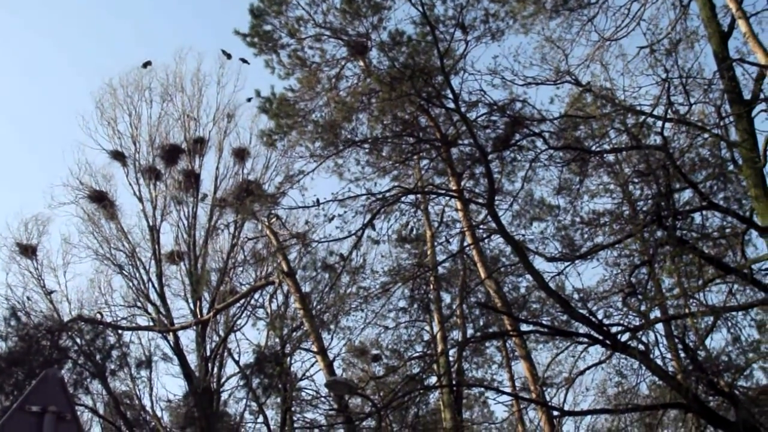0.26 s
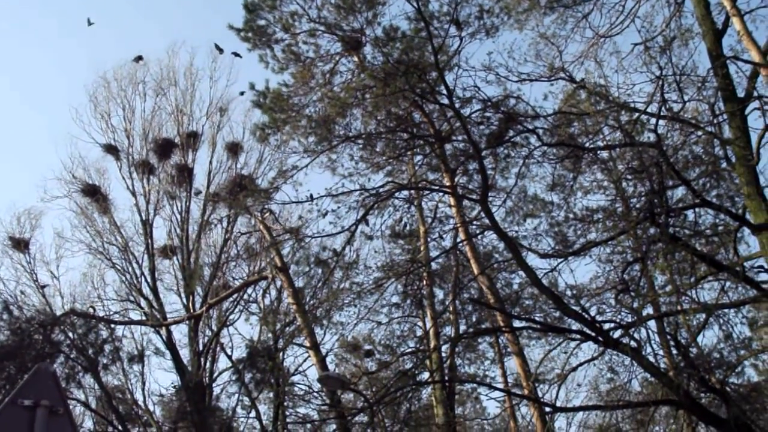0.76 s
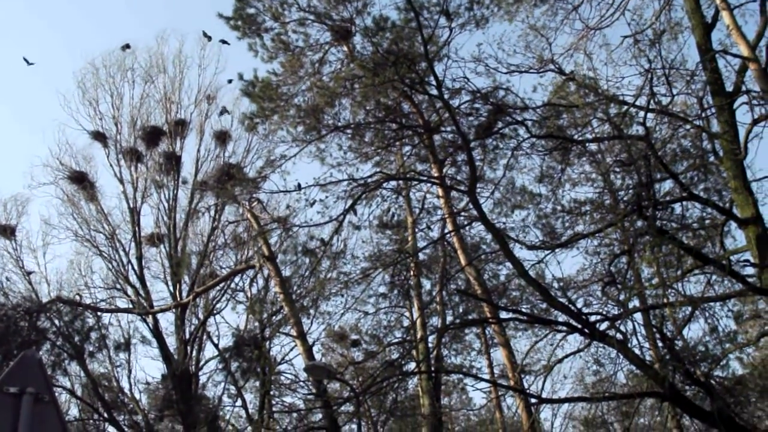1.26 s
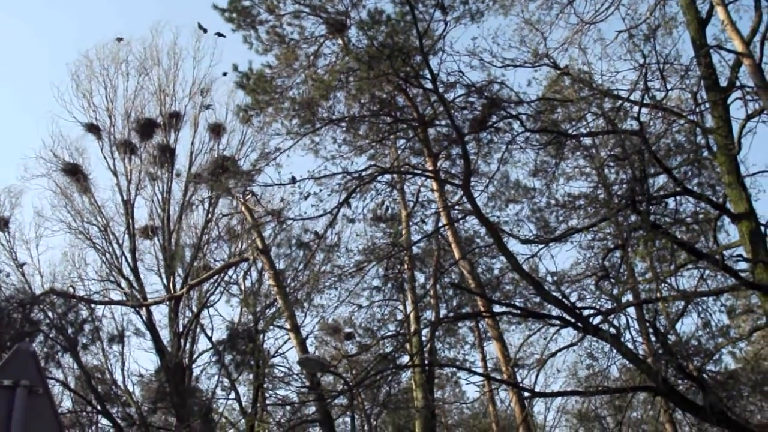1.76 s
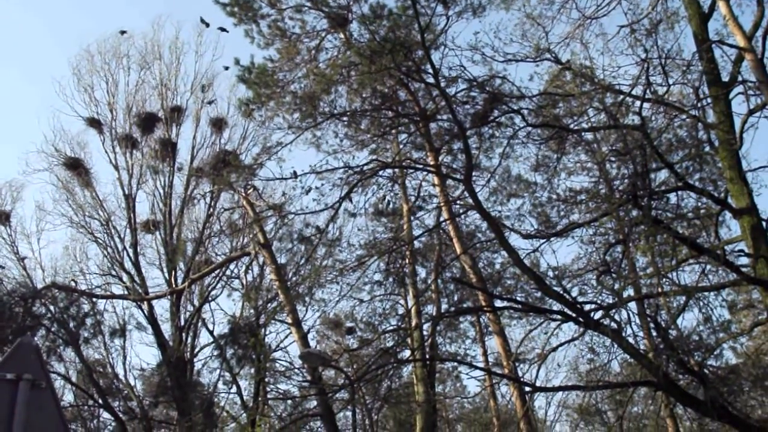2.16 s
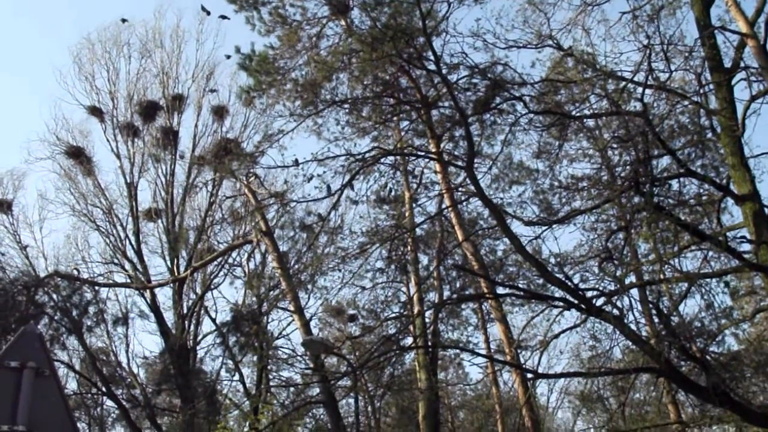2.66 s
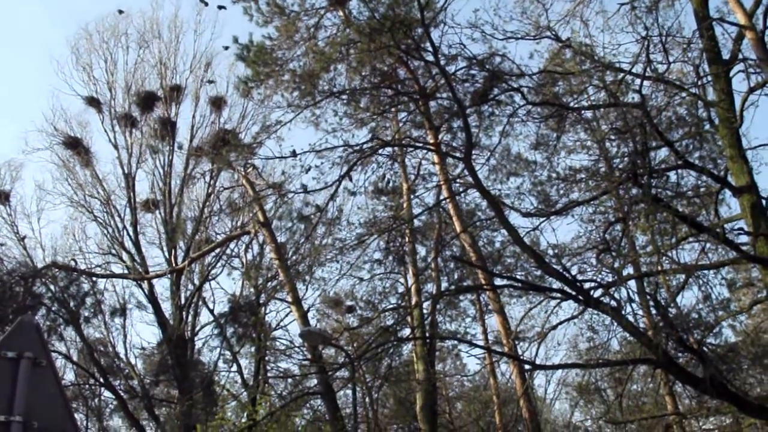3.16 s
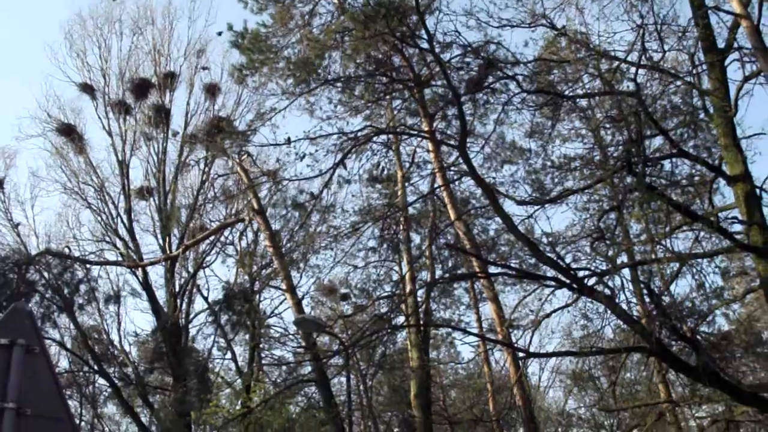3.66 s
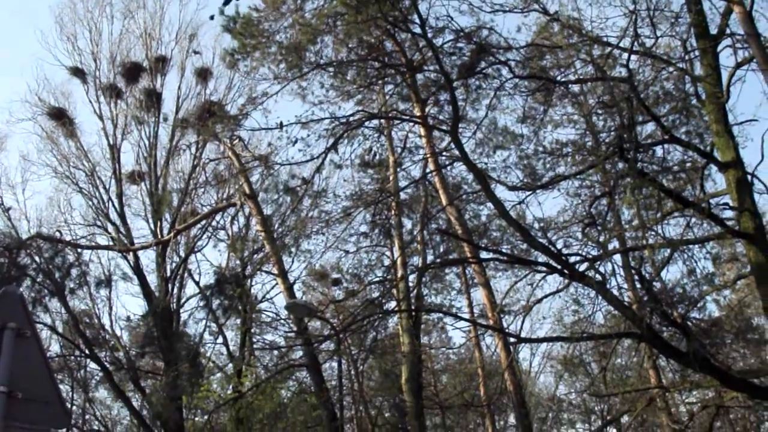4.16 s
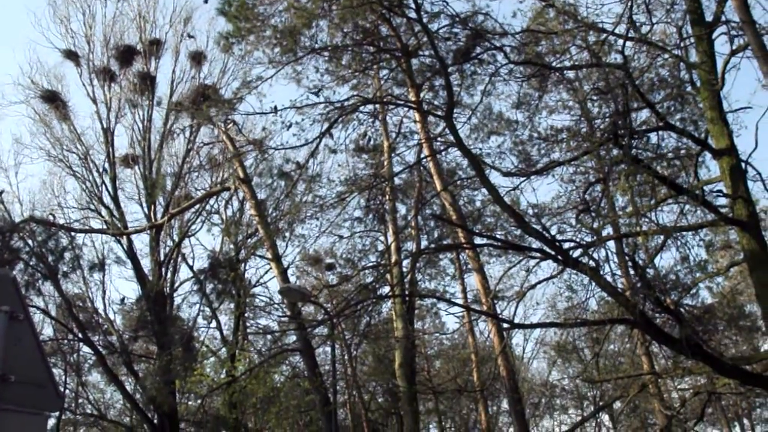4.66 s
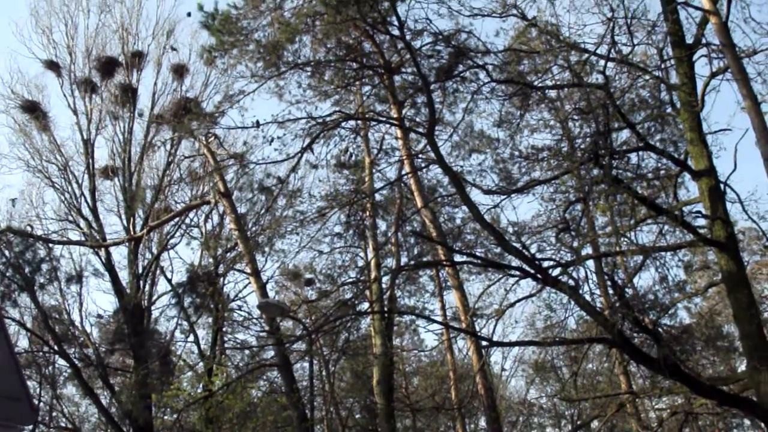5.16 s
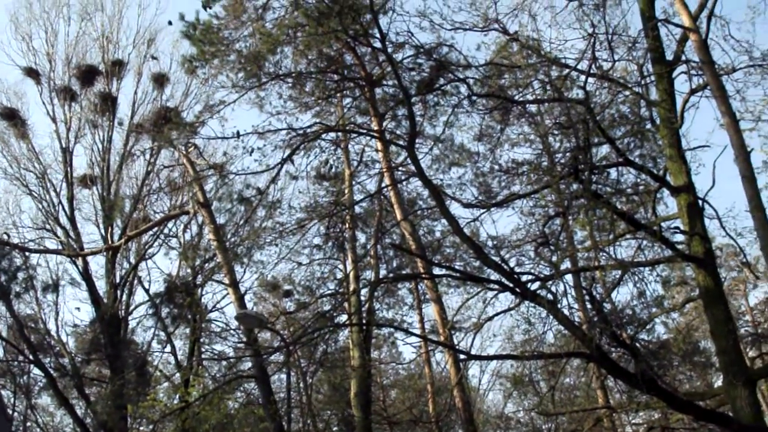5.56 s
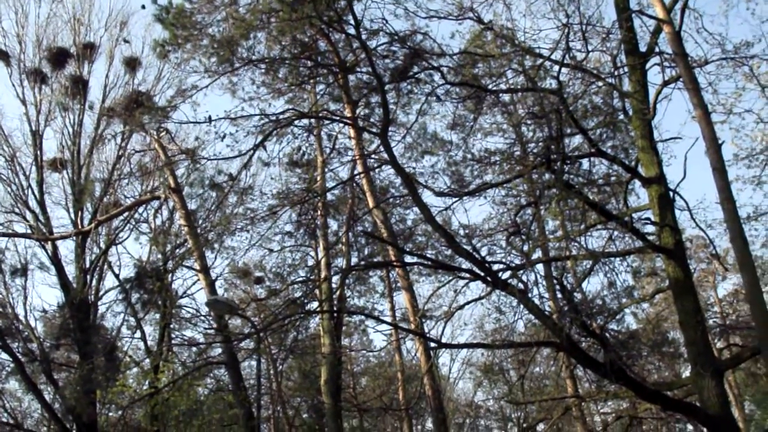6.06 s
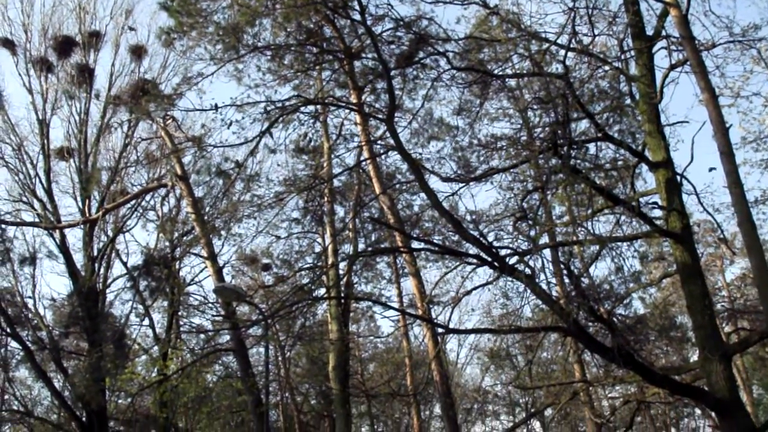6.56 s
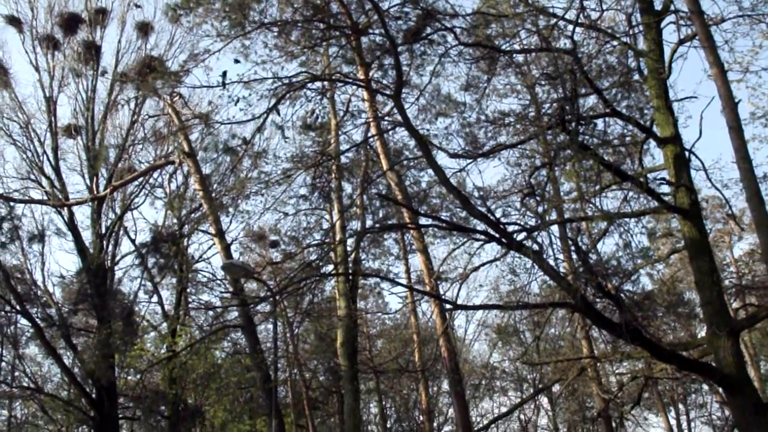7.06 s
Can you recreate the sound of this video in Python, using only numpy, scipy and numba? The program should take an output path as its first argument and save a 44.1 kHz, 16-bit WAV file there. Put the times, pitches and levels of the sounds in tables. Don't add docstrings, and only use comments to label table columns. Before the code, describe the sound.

A large rook colony caws hoarsely and without pause high in bare trees, while wind thumps and flutters on a small camera microphone.

```python
import sys
import numpy as np
from scipy import signal
from scipy.fft import rfft, irfft, next_fast_len
from scipy.io import wavfile
from scipy.ndimage import uniform_filter1d
from numba import njit

SR = 44100
rng = np.random.default_rng(int(sys.argv[2]) if len(sys.argv) > 2 else 0)


def voltage_ratio(level):
    return 10 ** (np.asarray(level, float) / 20)


def log_audio(samples):
    frames = np.atleast_2d(samples).T
    limited = np.clip(frames, -1, 1)
    pcm = np.round(limited * 32767).astype(np.int16)
    wavfile.write(sys.argv[1], SR, pcm)


N = 322812
T = np.arange(N) / SR

# frequency [Hz], level per Hz [dB].
VOICE_RESPONSE = [(250, -24), (517, -8.5), (804, -6), (1060, -3.5), (1290, 1), (1800, 0.5), (2240, -3),
                  (2470, -5.5), (2980, 1.5), (3400, -4.5), (3650, -9), (4220, -21.5), (5260, -43.5),
                  (6400, -25), (7500, -25.5), (10900, -68)]


def level(x, db):
    return x * voltage_ratio(db) / np.sqrt(np.mean(x ** 2) + 1e-20)


def colour(x, table):
    size = next_fast_len(N + SR)
    hz, db = np.transpose(table)
    bin_hz = np.arange(size // 2 + 1) * SR / size
    gain = voltage_ratio(np.interp(np.log(bin_hz + 1), np.log(hz), db))
    return irfft(rfft(x, size) * gain, size)[..., :N]


def curves(table):
    s, *columns = np.transpose(table)
    return [np.interp(T, s, column) for column in columns]


def even(x, span_s, share):
    k = int(span_s * SR)
    power = uniform_filter1d(uniform_filter1d(x ** 2, k), k)
    return level(x / (power + 1e-3 * power.mean()) ** (np.clip(share, 0, 1) / 2), 0)


def walk(rate_hz, size=N):
    k = int(SR / rate_hz)
    steps = np.repeat(rng.standard_normal(size // k + 1), k)
    return 1.29 * uniform_filter1d(uniform_filter1d(steps, k), k)[:size]


def band(x, lo_hz, hi_hz):
    return signal.sosfilt(signal.butter(4, [lo_hz, hi_hz], "bandpass", fs=SR, output="sos"), x)


@njit
def svf(x, hz, width_hz):
    y, b, l = np.empty(len(x)), 0., 0.
    for i in range(len(x)):
        g, k = np.tan(np.pi * hz[i] / SR), width_hz / hz[i]
        v = (b + g * (x[i] - l)) / (1 + g * (g + k))
        b, l, y[i] = 2 * v - b, l + 2 * g * v, k * v
    return y


def add(out, sound, start_s):
    i = int(start_s * SR)
    part = sound[max(-i, 0):max(N - i, 0)]
    out[max(i, 0):max(i, 0) + len(part)] += part


def caw(length_s, hz, throat_hz, rough, width_hz, leak_db):
    chance = rng.standard_normal((2, 400))
    n = int(min(length_s, .6) * SR)
    u = np.arange(n) / n
    arch = 1 - .35 * (u - .35) ** 2
    cycles = np.cumsum(hz * arch / SR)
    beats = np.cumsum(np.clip(1 + .12 * rough * chance[0], .4, 2))
    place = np.interp(beats[beats < cycles[-1]], cycles, np.arange(n - 0.))
    size = voltage_ratio(5.5 * rough * chance[1, :len(place)])
    whole = place.astype(int)
    pulses = np.bincount(whole, size * (1 - place + whole), n + 1)
    pulses = pulses + np.bincount(whole + 1, size * (place - whole), n + 1)
    source = level(pulses[:n] - pulses.mean(), 0) + 0.75 * rough * rng.standard_normal(n)
    voiced = svf(svf(source, throat_hz * arch, width_hz), throat_hz * arch, width_hz)
    swell = np.clip(u / .18, 0, 1) * np.clip((1 - u) / .3, 0, 1)
    return swell * (level(voiced, 0) + level(source, leak_db))


def chorus(count):
    # start [s], level [dB], brightness [dB] as nearer open-billed birds join in.
    crowd_levels = [(0, -22.5, 2), (.62, -20, 1.5), (.78, -19.5, -6), (1.1, -18.5, -8), (1.3, -21.5, 1.5),
                    (1.9, -20, -6.5), (2.2, -18, -1.5), (2.45, -19.5, -11.5), (2.8, -22.5, -2.5),
                    (3.1, -19.5, -5), (3.52, -22, -8), (4.28, -22.5, -3), (4.4, -26, -4.5),
                    (4.88, -37, 1.5), (5.12, -21, -7.5), (5.7, -25, -5.5), (6.4, -22.5, -5.5),
                    (7.32, -21.5, 1)]
    crowd = np.zeros(N)
    for turn, (when, a, b, c, d) in enumerate(rng.random((count, 5))):
        pitch_hz = 200 + 240 * b ** 2
        throat_hz = 1100 + 2300 * ((turn + c) * .382 % 1)
        voice = caw(.25 + .2 * a, pitch_hz, throat_hz, rough=.34 + .36 * d, width_hz=585.0, leak_db=2.5)
        add(crowd, voice * voltage_ratio(-6 * a * d), (turn + when) / count * (T[-1] + .4) - .4)
    crowd = band(colour(crowd, VOICE_RESPONSE), 527, 12000)
    low_db, bright_db = curves(crowd_levels)
    under = [signal.sosfiltfilt(signal.butter(3, hz, fs=SR, output="sos"), crowd) for hz in (1700, 2500, 4800)]
    low, middle, upper, treble = np.diff([0 * crowd, *under, crowd], axis=0)
    parts = [(low, -2.5), (middle, bright_db - 4.5), (upper, bright_db - 7.0), (treble, 0.94 * bright_db - 13.0)]
    return sum(even(part, 0.14, 1.0) * voltage_ratio(low_db + db) for part, db in parts)


def near_caws():
    # start [s], length [s],
    # pitch [Hz], level [dB], throat [Hz].
    single_caws = [(.2, 0.28, 230, -35, 1230), (.48, 0.27, 219.3, -27.5, 1220),
                   (2.2, 0.25, 224.4, -35.5, 1160), (2.4, 0.43, 228, -35.5, 1180),
                   (4.85, 0.26, 250, -34, 1610), (5.5, 0.29, 225, -42, 1270),
                   (0.424, 0.26, 332, -28, 1470), (0.759, 0.45, 229, -31.5, 1340),
                   (1.416, 0.35, 242, -27.5, 1440), (1.753, 0.3, 275, -28, 1620),
                   (2.05, 0.44, 231.2, -28, 1300), (2.887, 0.37, 208, -29.5, 1170),
                   (3.944, 0.36, 214, -29, 1190), (5.021, 0.33, 285, -41, 1700),
                   (5.416, 0.21, 245, -31.5, 1320), (5.75, 0.31, 234.5, -30, 1290),
                   (5.88, 0.22, 259.4, -28.5, 1800), (6.08, 0.18, 250, -31, 1440),
                   (3.3, 0.37, 246.7, -33, 1410), (6.6, 0.56, 304.5, -31, 1614),
                   (-1.5, 0.21, 299.6, -25, 2030), (1.3, .22, 240, -25, 2130),
                      (1.1, 0.29, 310, -31, 2200), (0.7, .35, 265.2, -45.5, 1930),
                      (2.6, 0.28, 257.3, -26.5, 1800), (2.5, 0.27, 274.9, -30, 1960),
                      (3.5, 0.33, 320, -30.5, 1750), (4.5, 0.15, 130, -41, 2400),
                      (3.5, .2, 255.4, -27, 1800), (4, 0.39, 303.5, -31, 1800), (5, 0.22, 170, -32, 1570),
                      (2, .42, 240, -35, 3700), (-0.4, .2, 270, -29, 2620), (-0.3, 0.13, 250, -26, 2700),
                      (7, .38, 243.2, -23, 2180), (2.5, 0.4, 261.8, -29.5, 2150), (7, .3, 255, -32.5, 2080),
                      (7, 0.61, 250, -29.5, 2350), (5, 0.5, 250, -31.5, 2000), (6.5, 0.16, 270, -29, 1300),
                      (7, 0.56, 300.7, -28, 1890),
                   (0.38, .26, 273.3, -20.5, 3100), (.56, .25, 265.6, -24.5, 2980),
              (.88, .16, 249.4, -26.5, 2940), (1.2, .3, 240.3, -21, 2886), (1.47, .25, 263.3, -29, 2950),
              (2.1, 0.21, 229.8, -23, 3130), (.0, 0.12, 270, -37, 2960), (0.119, .25, 243.5, -43, 2880),
              (1.8, .25, 248.6, -33, 2930), (2.4, 0.28, 252.6, -30, 3220), (2.904, 0.17, 248, -24, 2970),
              (3.061, 0.16, 241.4, -32, 3160), (3.699, 0.33, 247.8, -30, 2920),
              (5.08, 0.12, 256, -35, 3070), (3.979, 0.36, 252, -24, 3080), (4.6, .28, 258.7, -30.5, 2400),
              (5.599, 0.56, 295, -30.5, 3047), (6.56, .28, 266.8, -27, 3200), (6.97, .2, 250, -20.5, 3160),
              (7.06, 0.27, 259, -26.5, 3010)]
    out = np.zeros(N)
    for start_s, length_s, hz, db, throat_hz in single_caws:
        rough = .2 + .0055 * max(hz - 208, 0)
        voice = caw(length_s, hz, throat_hz, rough, width_hz=0.35 * throat_hz, leak_db=-1.0)
        add(out, voice * voltage_ratio(db), start_s)
    return level(colour(out, VOICE_RESPONSE), 0) * np.std(out)


def clear_bird():
    # time [s], pitch [Hz], level [dB], throat focus [0-3].
    calls = [
        [(.12, 221, -27, 2.4), (.23, 221, -19, 2.4), (.32, 222, -25, 2.4), (.42, 236, -22, 2.4),
         (.45, 236, -24, 2.4)],
        [(3.69, 208, -22, 2), (3.72, 222, -18.5, 2), (3.76, 229, -18, 1.5), (3.81, 231.5, -17.5, .85),
         (3.88, 229.5, -18.5, .8), (3.97, 222.5, -18.5, 1.6), (4.025, 220, -16, 3), (4.08, 210, -18, 3),
         (4.13, 203, -30, 3)],
        [(4.43, 197, -27, 3), (4.49, 219, -24, 3), (4.54, 227, -26, 1), (4.58, 229, -29.5, .3),
         (4.64, 227.5, -30, .3), (4.685, 221, -25.5, 1.2), (4.74, 211, -28, .8), (4.79, 201.5, -30, .6),
         (4.85, 192, -33, .5)],
    ]
    # frequency [Hz], level [dB].
    throat = [(600, -55), (1300, -14), (1800, -11), (2080, -1.5), (2280, 0), (2760, -3.5), (3050, -6),
              (3900, -50)]
    out, k = np.zeros(N), np.arange(3, 18)[:, None]
    throat_hz, throat_db = np.transpose(throat)
    for call in calls:
        on = (T > call[0][0]) & (T < call[-1][0])
        t = T[on]
        hz, db, focus = (c[on] for c in curves(call))
        odd_db = np.clip(-24 * (focus - .6), -10, 0)
        hz = hz * (1 + .004 * walk(60, size=len(hz)) + .005 * walk(220, size=len(hz)))
        waver_db = np.array([2.2 * walk(28, size=len(hz)) + 3.5 * walk(150, size=len(hz)) for _ in k])
        focus_db = focus * np.interp(np.log(k * hz), np.log(throat_hz), throat_db)
        gain = voltage_ratio(db + waver_db + focus_db + (k % 2) * odd_db)
        fade = np.clip(np.minimum(t - t[0], t[-1] - t) / 0.035, 0, 1)
        cycles = k * np.cumsum(hz) / SR + rng.random(k.shape)
        out[on] += fade * np.sum(gain * np.sin(2 * np.pi * cycles), axis=0)
    return out


def squeals():
    # start [s], length [s], foot pitch [Hz], level [dB], crest minus foot level [dB].
    arcs = [
        (2.41, .2, 3100, -24, -13),
        (2.815, .18, 3050, -20, -16),
        (3.218, .168, 3080, -18, -19),
        (3.628, .185, 3100, -17, -24),
        (4.06, .2, 3150, -25, -14),
        (6.53, .045, 3200, -24, 0),
        (6.565, .16, 2950, -25, 7),
        (6.925, .2, 3200, -27, -12),
    ]
    out = np.zeros(N)
    for start_s, length_s, foot_hz, db, crest_db in arcs:
        crest_hz = min(3780, foot_hz + 5200 * length_s)
        u = np.arange(int(length_s * SR)) / (length_s * SR)
        arc = np.sin(np.pi * u) ** 0.9
        shake, waver = (walk(rate_hz, size=SR // 2)[:len(u)] for rate_hz in (250, 60))
        hz = (foot_hz + (crest_hz - foot_hz) * arc) * (1 + .01 * shake)
        buzz = 1 + .9 * (1 - .8 * arc ** 2) * np.sin(2 * np.pi * 165 * u * length_s)
        fade = np.clip(np.minimum(u, 1 - u) / 0.018, 0, 1)
        swell = fade * voltage_ratio(db + crest_db * arc ** 2 + 2.0 * waver)
        add(out, swell * buzz * np.sin(2 * np.pi * np.cumsum(hz) / SR), start_s)
    return out


def steady_birds():
    # start [s], length [s], from [Hz], to [Hz], level [dB], throat [Hz].
    calls = [(2.3, .3, 385, 370, -41, 560), (2.88, .36, 352, 340, -44, 400), (3.25, .5, 350, 332, -41, 520),
             (3.95, .6, 356, 334, -39, 540), (2.9, .3, 428, 432, -28, 1200),
             (3.96, .38, 424, 434, -29, 1200), (4.09, .13, 1140, 975, -28, 1050),
             (3.12, .2, 665, 650, -29, 1320), (5.49, .2, 425, 445, -29, 1300),
             (5.53, .26, 412, 416, -31, 3000), (5.85, .3, 420, 412, -31, 3000),
             (4.05, .17, 440, 428, -27, 3100), (4.47, .1, 455, 445, -29, 1400),
             (4.64, .09, 1580, 1530, -30, 1550), (6.2, .14, 600, 590, -29, 1800),
             (6.97, .17, 392, 398, -26, 3100), (7.12, .16, 418, 410, -28, 2950)]
    out, k = np.zeros(N), np.arange(1, 9)[:, None]
    for start_s, length_s, from_hz, to_hz, db, throat_hz in calls:
        u = np.arange(int(length_s * SR)) / (length_s * SR)
        shake, *waver = (walk(rate_hz, size=SR)[:len(u)] for rate_hz in (120, *[25] * 8))
        hz = (from_hz + (to_hz - from_hz) * u) * (1 + .004 * shake)
        resonance = np.exp(-(np.log(k * hz / throat_hz) / .26) ** 2 / 2)
        gain = resonance * voltage_ratio(db + 2 * np.array(waver))
        cycles = k * np.cumsum(hz) / SR + rng.random(k.shape)
        tone = np.sum(gain * np.sin(2 * np.pi * cycles), axis=0)
        add(out, tone * np.clip(np.minimum(u, 1 - u) / 0.17, 0, 1), start_s)
    return out


def small_bird():
    # start [s], length [s], from [Hz], to [Hz], level [dB].
    lisps = [
        (2.45, 0.15, 7880, 8900, -43),
        (2.907, 0.32, 8800, 9650, -50.5),
        (4.054, 0.25, 8700, 9400, -47),
        (5.096, 0.13, 7400, 7960, -41),
        (6.094, 0.24, 7600, 7900, -42),
    ]
    out = np.zeros(N)
    for start_s, length_s, from_hz, to_hz, db in lisps:
        u = np.arange(int(length_s * SR)) / (length_s * SR)
        hz = from_hz + (to_hz - from_hz) * u
        air = svf(svf(rng.standard_normal(len(u)), hz, 1300.), hz, 1300.)
        air = air * voltage_ratio(3 * walk(30, size=SR // 2)[:len(u)])
        add(out, level(air, db) * np.sin(np.pi * u), start_s)
    return out


def wood(x, t60_s, wet_db):
    tails = rng.standard_normal((2, SR)) * np.exp(-np.log(1000) * T[:SR] / t60_s)
    tails /= np.sqrt(np.sum(tails ** 2, axis=1, keepdims=True))
    wet, side = signal.fftconvolve(x[None], tails, axes=1)[:, :N]
    return np.array([x + voltage_ratio(wet_db) * wet, side])


def wind():
    # time [s], level [dB].
    breeze = [(0.0, -27), (0.26, -24.5), (0.55, -30), (1.24, -13.5), (1.67, -21.5), (1.79, -19.5),
              (2.14, -33), (2.34, -28.5), (3.79, -33), (3.94, -35), (4.85, -30), (5.06, -21), (5.53, -31.5),
              (6.03, -27), (6.52, -28.5), (6.77, -27), (7.01, -29), (7.32, -31)]
    # middle [s], length [s], peak [dB], flutter minus peak [dB].
    gusts = [(0.018, 0.075, -20.5, -1.5), (0.161, 0.12, -14.5, -9), (0.48, 0.06, -23, -20),
             (0.567, 0.086, -18.5, -11), (0.838, 0.16, -12.5, -15.5), (1.147, 0.12, -10.5, -12),
             (1.425, 0.071, -8, -10), (1.693, 0.16, -13, -7.5), (2.113, 0.22, -15, -14.5),
             (2.498, 0.074, -35, -8), (2.663, 0.17, -30.5, -11), (2.88, 0.1, -31, -18.6),
             (2.961, 0.02, -17, -22), (3.225, 0.038, -34, -19), (4.12, 0.12, -31, -23),
             (4.556, 0.21, -26, -28), (5.13, 0.075, -14.5, -6), (5.28, 0.11, -35, -16),
             (5.384, 0.033, -16.5, -18), (5.504, 0.06, -16.5, -12.5), (5.807, 0.098, -20.5, -6),
             (5.983, 0.062, -21, -10), (6.19, 0.082, -18, -22), (6.323, 0.069, -26, -8),
             (6.566, 0.098, -18.5, -9), (6.682, 0.043, -20.5, -8), (6.76, 0.11, -15, -17),
             (6.902, 0.12, -21, -13), (7.015, 0.044, -20.5, -14), (7.283, 0.29, -18.5, -35)]
    power = voltage_ratio(curves(breeze)[0]) ** 2
    flutter_power = power * voltage_ratio(-11) ** 2
    for middle_s, length_s, peak_db, flutter_db in gusts:
        bell = voltage_ratio(peak_db) ** 2 * np.exp(-((T - middle_s) / (0.36 * length_s)) ** 2)
        power = power + bell
        flutter_power = flutter_power + bell * voltage_ratio(flutter_db) ** 2
    air = rng.standard_normal((3, N))
    hz = np.clip(53.1 + 1.52 * (10 * np.log10(power) + 15.2) + 8 * walk(5.3), 20, 120)
    eddies = even(svf(svf(air[0], hz, 27.5), hz, 27.5), 0.13, 0.24)
    heave = level(band(air[1], 3.6, 46.8), -2.8)
    flutter = colour(band(air[2], 88.0, 490), [(90, -5.0), (250, -35.5), (500, -42.5)])
    flutter = level(flutter, 0) * voltage_ratio(3.3 * walk(13))
    return np.sqrt(power) * (0.81 * eddies + heave) + np.sqrt(flutter_power) * flutter


def hiss():
    # frequency [Hz], level per Hz [dB].
    hiss_response = [(150, -11), (340, 0.5), (600, -6), (1000, 3), (4500, -15.5), (6000, -12.5),
                     (8000, -13.5), (11000, -18)]
    return level(colour(rng.standard_normal((2, N)), hiss_response), -34.5)


def whine():
    hz = 7445 + 9 * walk(40)
    return np.sqrt(2) * voltage_ratio(-45.5 + 1.5 * walk(20)) * np.exp(2j * np.pi * np.cumsum(hz) / SR)


def scene():
    # frequency [Hz], level [dB].
    mic_edge = [(3400, 0), (3750, -8), (4200, -22)]
    # frequency [Hz], level [dB].
    side_response = [(500, -30), (1200, -20), (3000, -12), (4500, -10), (6000, -4), (7500, -3), (11000, -1)]
    far = chorus(count=200) + near_caws() + small_bird()
    near = colour(clear_bird() + squeals() + steady_birds(), mic_edge)
    birds = wood(far + .45 * near, t60_s=.5, wet_db=-6) + [.6 * near, 0 * near]
    mid, side = birds + hiss()
    tone = whine()
    mid = mid + wind()
    late, lag_share = signal.hilbert(mid, next_fast_len(N))[:N].imag, .52
    side = colour(np.sqrt(lag_share) * late + np.sqrt(1 - lag_share) * side, side_response)
    mid, side = mid + tone.real, side + voltage_ratio(-4.5) * tone.imag
    return np.array([mid + side, mid - side])


def thin(pair):
    # frequency [Hz], share of mid cells kept [0-1], share of side cells kept [0-1].
    kept_shares = [(900, 1, 0), (1500, 1, .025), (2400, .99, .035), (3100, 1, .09), (3600, .97, .015),
                   (4050, .78, .005), (4600, .86, .004), (5400, .76, .012), (6200, .92, .1),
                   (6900, .98, .45), (7300, 1, 1), (9000, .88, .95), (11000, .45, .85)]
    mid, side = signal.stft([pair[0] + pair[1], pair[0] - pair[1]], nperseg=2048, window="cosine")[2] / 2
    cells = [np.log(np.abs(z[:-1]).reshape(128, 8, -1).mean(axis=1) + 1e-12) for z in (mid, side)]
    row = np.arange(128)[:, None]
    reach = np.where(row < 26, .6, .1)
    drift = uniform_filter1d(uniform_filter1d(rng.standard_normal(cells[0].shape), 2), 2, axis=0)
    masker = reach * cells[0][14:21].mean(axis=0) + .8 * uniform_filter1d(cells[0], 15) + .5 * drift
    moment = .7 * rng.standard_normal(cells[0].shape[1])
    top = np.clip((row - 42) / 16, 0, 1) * moment
    standings = (cells[0] - masker - top, cells[1] - 0.54 * cells[0] - moment)
    hz, *shares = np.transpose(kept_shares)
    cell_hz = (np.arange(128) + .5) * 8 * SR / 2048
    kept = []
    for z, standing, share in zip((mid, side), standings, shares):
        rank = standing.argsort(axis=1).argsort(axis=1) / standing.shape[1]
        keep = rank >= 1 - np.interp(cell_hz, hz, share)[:, None]
        size = np.abs(z[160:-1])
        usual = np.median(size.reshape(108, 8, -1), axis=1)
        z[160:-1] *= size > .9 * np.repeat(usual, 8, axis=0)
        kept.append(z * np.vstack([np.repeat(keep, 8, axis=0), keep[-1:]]))
    mid, side = signal.istft(np.array(kept), nperseg=2048, window="cosine")[1][:, :N]
    return np.array([mid + side, mid - side])


def roll_off(x):
    return signal.sosfilt(signal.butter(12, 11020, fs=SR, output="sos"), x)


def record(dry):
    limited = dry / (1 + (dry / .97) ** 8) ** (1 / 8)
    offset = 62
    thinned = np.roll(thin(np.roll(limited, -offset, axis=1)), offset, axis=1)
    return roll_off(thinned)


dry = scene()
out = record(dry)
log_audio(out)
```